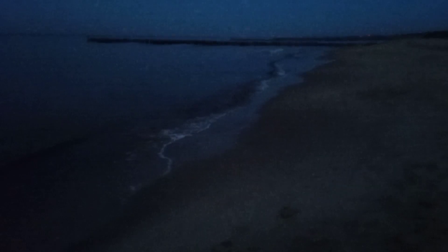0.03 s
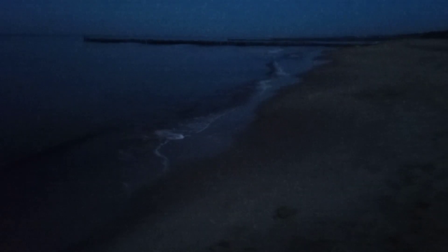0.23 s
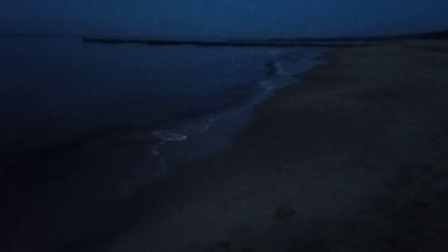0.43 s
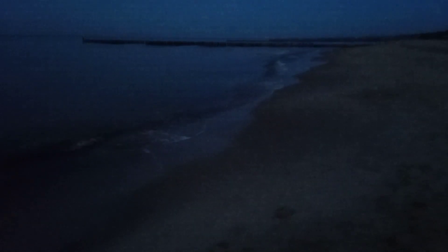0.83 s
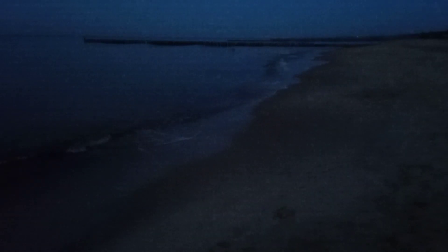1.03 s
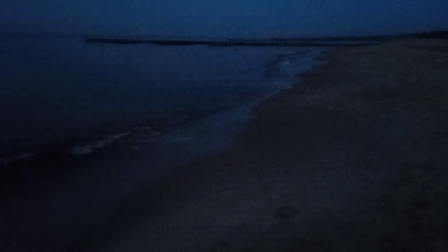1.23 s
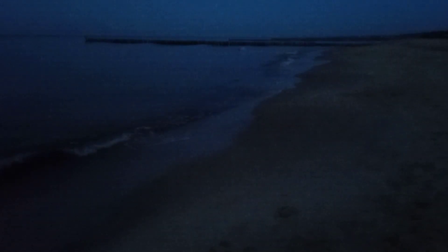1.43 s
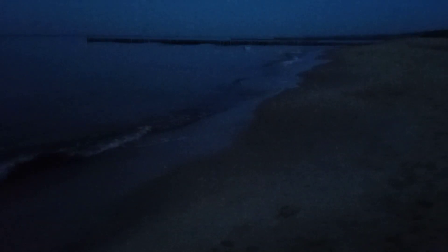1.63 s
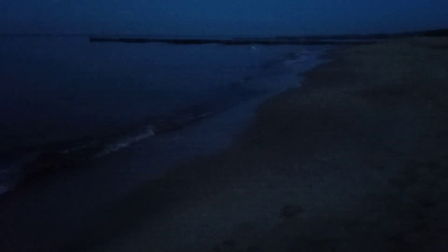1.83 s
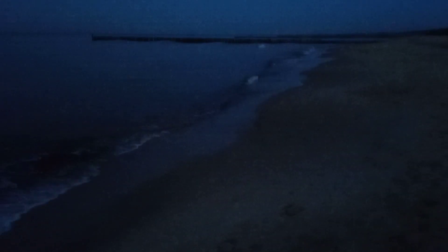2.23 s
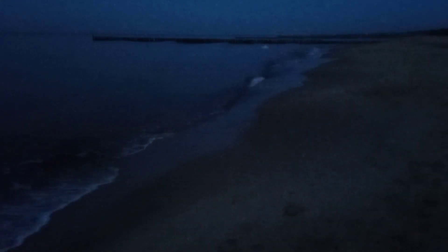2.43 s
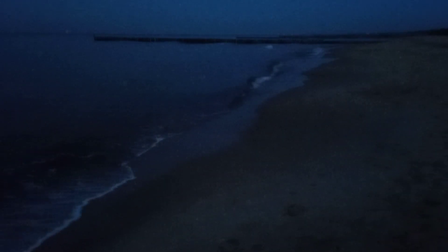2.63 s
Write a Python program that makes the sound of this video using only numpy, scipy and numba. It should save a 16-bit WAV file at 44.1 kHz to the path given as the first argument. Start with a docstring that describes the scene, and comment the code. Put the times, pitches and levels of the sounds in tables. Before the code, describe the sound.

A small wave washes onto a sandy shore. It swells out of a faint hush of distant surf, folds with a soft thump, splashes and gurgles, then fades as fizzing foam. A small mono microphone picks it up.

```python
"""A faint hush of distant surf and low rumble is heard first; out of it a small wave swells for two
seconds, spills along a sandy shore and runs out as foam. Each trapped bubble is a damped oscillator,
the smaller the higher, so clouds of them range from deep churn through wash and splash to fizz and
spray. Single air pockets plop, drops spatter, and the folding crest gives a soft thump.
A small mono microphone hears it all."""
import sys
import numpy as np
from scipy import signal
from scipy.fft import rfft, irfft, next_fast_len
from scipy.io import wavfile
from numba import njit

SR = 44100
rng = np.random.default_rng(int(sys.argv[2]) if len(sys.argv) > 2 else 0)


def wav_out(sig):
    """Save sig, one row per channel (or a flat mono array), as 16-bit PCM at SR to the path in sys.argv[1]."""
    wavfile.write(sys.argv[1], SR, np.round(np.clip(np.atleast_2d(sig).T, -1, 1) * 32767).astype(np.int16))


N = 123479

# Envelopes of the wave's five bubble clouds: t/s, level/dB
CHURN_ENVELOPE = [(0, -70.5), (.35, -69.5), (.57, -58.5), (.85, -57.5), (1.3, -52.5), (1.72, -51.5),
                  (1.83, -45.5), (2.0, -53), (2.15, -60), (2.55, -68.5), (2.8, -74)]
WASH_ENVELOPE = [(0, -70), (0.28, -62.5), (0.65, -59), (0.87, -53.5), (1.0, -52.5), (1.3, -49.8),
                 (1.7, -50.5), (1.93, -49.5), (2.1, -57), (2.35, -63.5), (2.8, -64)]
FOAM_ENVELOPE = [(0, -91), (0.18, -82), (0.35, -68.5), (0.52, -65), (0.85, -63), (1.08, -59), (1.52, -55),
                 (1.6, -56.0), (1.66, -54), (1.76, -56.5), (2.0, -58.5), (2.45, -73.5), (2.8, -75.5)]
SPRAY_ENVELOPE = [(0, -89), (0.18, -78), (0.42, -71.5), (0.8, -66.5), (0.97, -62.5), (1.35, -59),
                  (1.58, -59), (1.66, -56.5), (1.8, -59), (1.94, -59), (2.0, -59), (2.4, -71), (2.8, -72)]
SPLASH_ENVELOPE = [(0, -64), (0.4, -57.5), (0.72, -53.5), (0.9, -50.5), (1.46, -45), (1.57, -45),
                   (1.68, -42), (1.78, -45.5), (1.9, -43.5), (2.0, -47.5), (2.1, -50), (2.4, -59),
                   (2.8, -63)]
# Spectral weighting of each layer: f/Hz, relative level/dB
SURF_SPECTRUM = [(25, -34), (45, -8.5), (70, 5), (130, -1), (220, 4), (380, -6), (600, 2), (1150, -14),
                 (1700, -4.5), (2500, -6), (3700, -18.5), (5200, -23.5), (8000, -20.5), (10000, -36),
                 (13800, -34), (15200, -26)]
CRACKLE_SPECTRUM = [(3000, -12), (5000, -3), (9000, 5), (11000, -14), (15000, -5)]
CHURN_SPECTRUM = [(40, -56), (80, -5), (140, -3), (200, -0.5), (290, 4), (400, 2.5), (550, -5), (1000, -19)]
WASH_SPECTRUM = [(250, -22), (400, -1.5), (520, -2), (750, 1.5), (950, -0.5), (1200, -11), (2000, -48)]
FOAM_SPECTRUM = [(2500, -20), (3600, -6.5), (4400, 1.5), (5500, 2.5), (6200, -1), (7200, -22.5),
                 (10000, -24.5)]
SPRAY_SPECTRUM = [(4500, -25), (6000, -2), (6700, 2.5), (7600, 0), (8400, -1), (9200, -7), (10500, -11),
                  (11600, -11.5), (14000, -22), (15000, -3), (15800, -10)]
SPLASH_SPECTRUM = [(600, -27), (900, -6.5), (1100, -1), (1700, -1), (2350, -3.5), (2800, -8), (3500, -19.5),
                   (5000, -36)]
# Spurts of droplets: onset t/s, centre f/Hz, level/dB, decay time/s
DROPLET_SPURTS = [(0.939, 8200, -51, 0.004), (1.02, 5350, -63, 0.057), (1.652, 5440, -49.5, .035),
                  (1.989, 11000, -59, 0.0099), (1.992, 6760, -56, 0.009)]
# Single air pockets and drops: onset t/s, starting f/Hz, level/dB, decay time/cycles
AIR_POCKETS = [(0.05, 104, -53, 1.5), (0.091, 4400, -65, 14), (0.209, 506, -54, 10.4),
               (0.569, 262, -42.5, 1.9), (0.684, 945, -42, 4.5), (0.745, 850, -39, 3.8),
               (0.747, 293, -48, 3.5), (0.846, 246, -43.5, 2.2), (0.856, 635, -40, 3),
               (1.025, 594, -44, 5.2), (1.074, 75, -47, 1.3), (1.083, 283, -36.5, 1.35),
               (1.108, 750, -45, 10), (1.25, 304, -48.5, 5.2), (1.475, 1510, -41, 7),
               (1.814, 220, -44, 1.8), (1.836, 115, -43.5, 2.3), (1.881, 1080, -36, 4.3),
               (1.909, 1120, -35, 3.7)]


def undb(db):
    """Amplitude ratio of a level in decibels."""
    return 10 ** (np.asarray(db) / 20)


def unit(x):
    """Normalisation to rms 1."""
    return x / np.sqrt(np.mean(x ** 2))


def envelope(rows):
    """Gain over time; straight lines in decibels give exponential growth and decay."""
    times, db = np.array(rows).T
    return undb(np.interp(np.arange(N) / SR, times, db))


def colour(x, spectrum):
    """Filtering by multiplication in the frequency domain; the result has rms 1."""
    hz, db = np.array(spectrum).T
    padded = 2 * next_fast_len(N)
    f = np.maximum(np.fft.rfftfreq(padded, 1 / SR), 1)
    gain = undb(np.interp(np.log(f), np.log(hz), db))
    return unit(irfft(rfft(x, padded) * gain)[:N])


def flicker(rate_hz):
    """Random modulation: slow noise of rms 1, strongest a little below rate_hz."""
    ratio = np.fft.rfftfreq(N, 1 / SR) / rate_hz
    return unit(irfft(rfft(rng.standard_normal(N)) * ratio / (1 + ratio ** 4), N))


def noise_band(hz, width_hz):
    """Resonance: a bell-shaped response selects one band of white noise, at rms 1."""
    detuning = 2 * (np.fft.rfftfreq(N, 1 / SR) - hz) / width_hz
    return unit(irfft(rfft(rng.standard_normal(N)) / (1 + detuning ** 2), N))


@njit
def ring(start_fraction, hz, cycles, size, rise):
    """Damped oscillation: nearing the surface, a bubble sharpens by the fraction rise per decay time."""
    out = np.zeros(N)
    for k in range(len(hz)):
        decay_samples = cycles[k] * SR / hz[k]
        first = int(start_fraction[k] * N)
        for i in range(min(int(5 * decay_samples), N - first)):
            age = i / decay_samples
            phase = 2 * np.pi * cycles[k] * age * (1 + rise * age / 2)
            out[first + i] += size[k] * np.exp(-age) * np.sin(phase)
    return out


def bubbles(low_hz, high_hz, cycles, spread_db, rise, count):
    """Incoherent superposition of bubbles, uniform in time and pitch; most are faint, a few stand out."""
    start_fraction, pitch, persistence, chance = rng.random((count, 4)).T
    hz = low_hz + (high_hz - low_hz) * pitch
    decay_cycles = max(cycles, .5) * (.5 + persistence)
    strength = undb(-spread_db * np.log(chance + 1 / 200))
    size = strength * np.sqrt(hz / decay_cycles)  # energy independent of decay time
    return unit(ring(start_fraction, hz, decay_cycles, size, float(rise)))


def background():
    """Amplitude-modulated noise: surf farther down the shore, and a low wavering rumble."""
    surf = colour(rng.standard_normal(N), SURF_SPECTRUM) * undb(-62.5 - 2.5 * flicker(11))
    rumble = undb(-69.5 - 1.2 * flicker(41)) * noise_band(hz=100, width_hz=22)
    return surf + rumble


def crackle():
    """Heavy damping makes clicks: froth from the previous wave bursts as it sinks into the sand."""
    peak_s, spread_s, level_db = 0.62, .17, -72.5
    clicks = bubbles(low_hz=4000, high_hz=14000, cycles=1.2, spread_db=4.0, rise=.01, count=1200)
    t = np.arange(N) / SR - peak_s
    return colour(clicks, CRACKLE_SPECTRUM) * undb(level_db) * np.exp(-(t / spread_s) ** 2 / 2)


def spray():
    """Impact noise: the finest droplets prickle on water and sand, merging into hiss."""
    ticks = bubbles(low_hz=4760, high_hz=16600, cycles=5.7, spread_db=4.5, rise=0.011, count=5000)
    mist = ticks + undb(13.0) * rng.standard_normal(N)
    return colour(mist, SPRAY_SPECTRUM) * envelope(SPRAY_ENVELOPE) * undb(-1.35 + .5 * flicker(25))


def spurts():
    """Transient excitation: droplets land together in bright spits that decay exponentially."""
    attack_s = .001
    out = np.zeros(N)
    for onset_s, hz, db, decay_s in DROPLET_SPURTS:
        t = np.clip(np.arange(N) / SR - onset_s, 0, None)
        burst = (1 - np.exp(-t / attack_s)) * np.exp(-t / decay_s)
        out += undb(db) * burst * noise_band(hz, width_hz=1700)
    return out


def foam():
    """Resonant frequency varies inversely with radius: tiny bursting bubbles fizz high over a hiss."""
    fizz = bubbles(low_hz=2818, high_hz=7440, cycles=18, spread_db=3.0, rise=0.0069, count=4000)
    water = fizz + undb(9.5) * rng.standard_normal(N)
    return colour(water, FOAM_SPECTRUM) * envelope(FOAM_ENVELOPE) * undb(-0.4 + 0.19 * flicker(18))


def plops():
    """Free vibration: single air pockets and drops ring briefly, gliding upward."""
    rise, attack_cycles = 0.078, 0.33
    out = np.zeros(N)
    for onset_s, hz, db, decay_cycles in AIR_POCKETS:
        periods = np.clip(np.arange(N) / SR - onset_s, 0, None) * hz
        age = periods / decay_cycles
        attack = 1 - np.exp(-periods / attack_cycles)
        phase = 2 * np.pi * periods * (1 + rise * age / 2)
        out += undb(db) * attack * np.exp(-age) * np.sin(phase)
    return out


def fold():
    """Cavity resonance: the folding crest traps a tube of air, which thumps amid a brief slosh."""
    peak_s, attack_s, decay_s, slosh_s = .835, 0.0052, 0.0068, 0.023
    thump_hz, rise_hz_per_s = 95, 450
    t = np.arange(N) / SR - peak_s
    pulse = np.exp(-np.maximum(-t / attack_s, t / decay_s))
    phase = 2 * np.pi * (thump_hz * t + rise_hz_per_s * t ** 2 / 2)
    thump = undb(-36.5) * pulse * np.sin(phase)
    slosh = undb(-52.5) * np.exp(-(t / slosh_s) ** 2 / 2) * noise_band(hz=129, width_hz=160)
    return thump + slosh


def churn():
    """Mass-spring resonance: large bubbles under the crest move much water, so they gurgle low."""
    cloud = bubbles(low_hz=131.7, high_hz=692, cycles=3.5, spread_db=2.5, rise=0.036, count=2500)
    water = cloud + undb(-1.5) * rng.standard_normal(N)
    return colour(water, CHURN_SPECTRUM) * envelope(CHURN_ENVELOPE) * undb(-0.23 + 0.57 * flicker(33))


def wash():
    """Air entrainment: water tumbles forward in a dense cloud of ringing middle-sized bubbles."""
    cloud = bubbles(low_hz=380, high_hz=1300, cycles=5, spread_db=1.8, rise=.05, count=4000)
    water = cloud + rng.standard_normal(N)
    return colour(water, WASH_SPECTRUM) * envelope(WASH_ENVELOPE) * undb(0.2 + 0.1 * flicker(11))


def splash():
    """Damping sets bandwidth: as the crest breaks, small bubbles ring clearly and short slaps do not."""
    cloud = bubbles(low_hz=902, high_hz=3630, cycles=17.4, spread_db=2.0, rise=0.011, count=7000)
    slaps = bubbles(low_hz=847, high_hz=3700, cycles=0.91, spread_db=1.5, rise=0.023, count=6000)
    water = cloud + undb(-1.5) * slaps + undb(-11.5) * rng.standard_normal(N)
    return colour(water, SPLASH_SPECTRUM) * envelope(SPLASH_ENVELOPE) * undb(-0.59 + 0.6 * flicker(4.7))


def scene():
    """Linear superposition: the pressures of all sources add, the same in both channels."""
    wave = churn() + wash() + splash() + foam() + spray()
    shore = wave + crackle() + plops() + spurts() + fold() + background()
    return np.array([shore, shore])


def record(dry):
    """Band limiting: the small microphone loses the deepest bass, and the top is cut steeply."""
    low_cut_hz, high_cut_hz = 32, 15720
    high_pass = signal.butter(2, low_cut_hz, "high", fs=SR, output="sos")
    low_pass = signal.ellip(12, .2, 80, high_cut_hz, fs=SR, output="sos")
    return signal.sosfilt(low_pass, signal.sosfilt(high_pass, dry))


dry = scene()
out = record(dry)
wav_out(out)
```